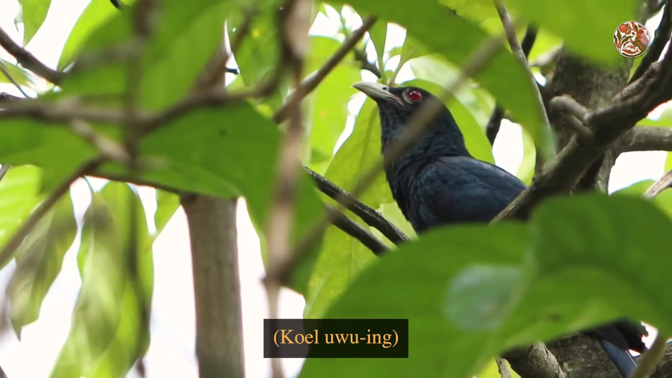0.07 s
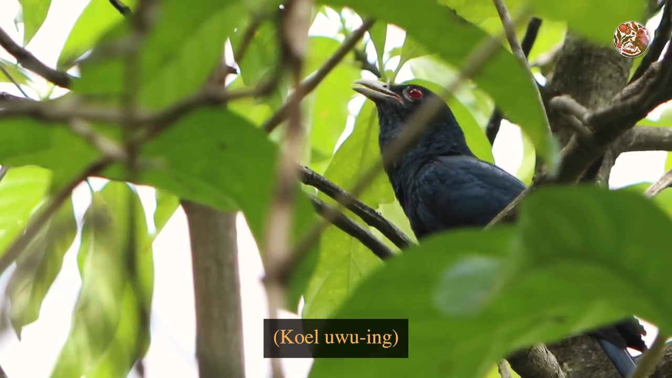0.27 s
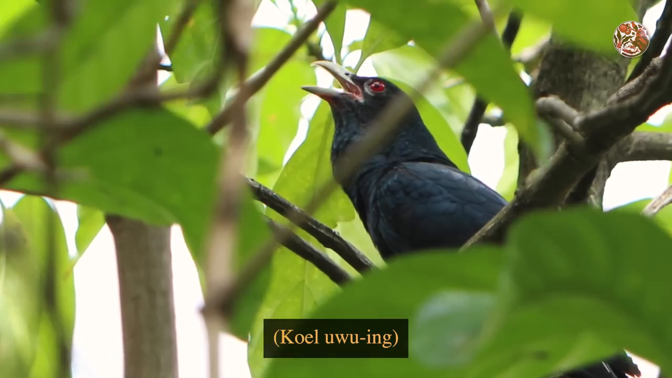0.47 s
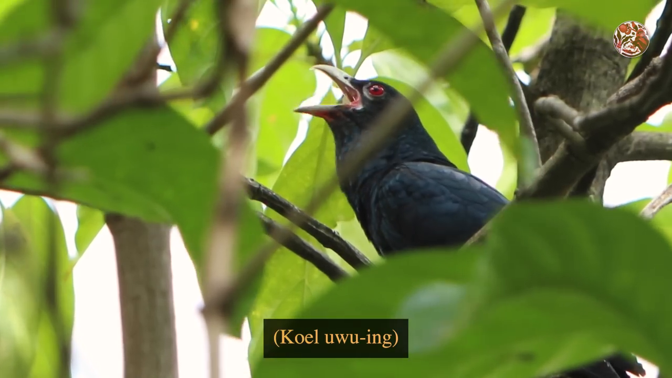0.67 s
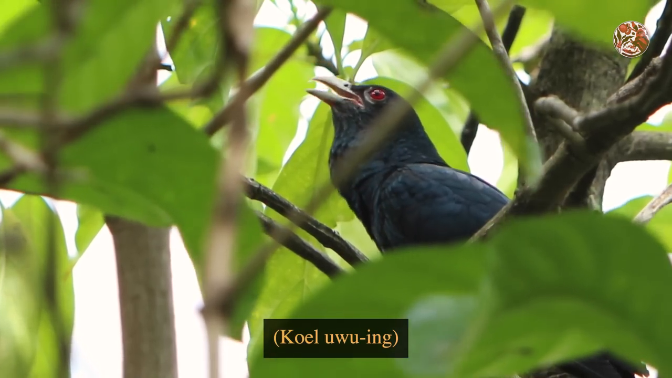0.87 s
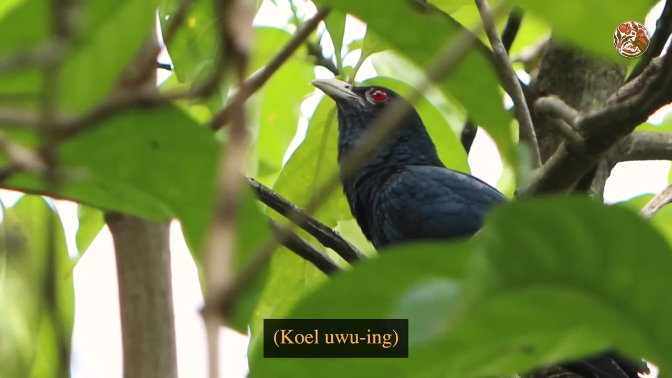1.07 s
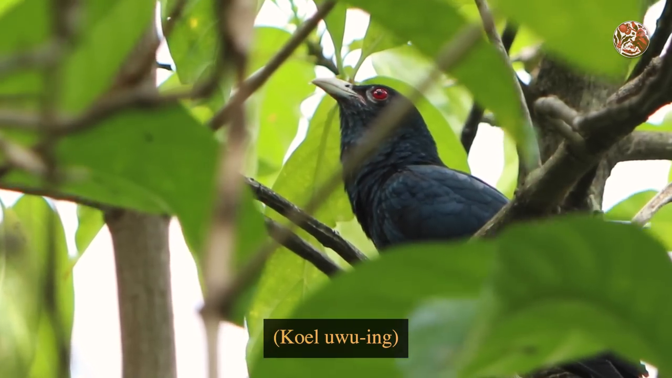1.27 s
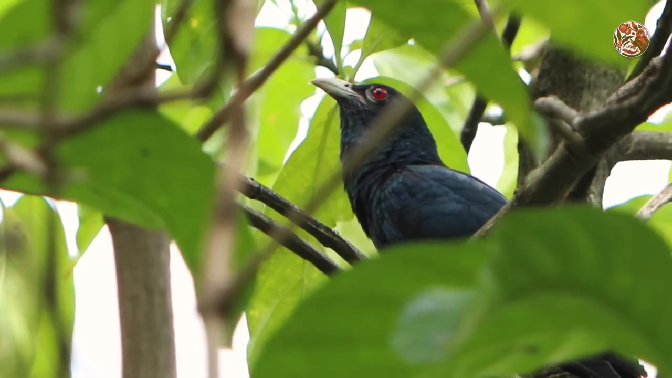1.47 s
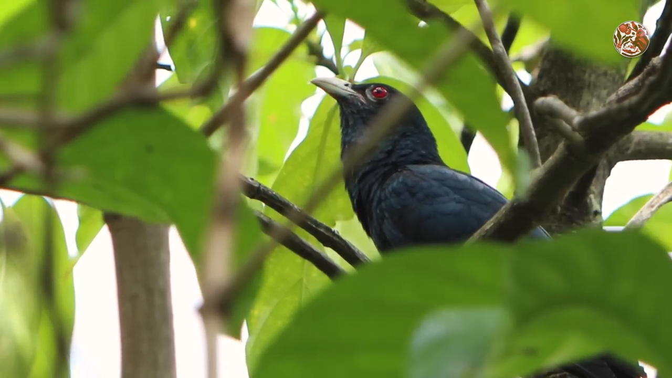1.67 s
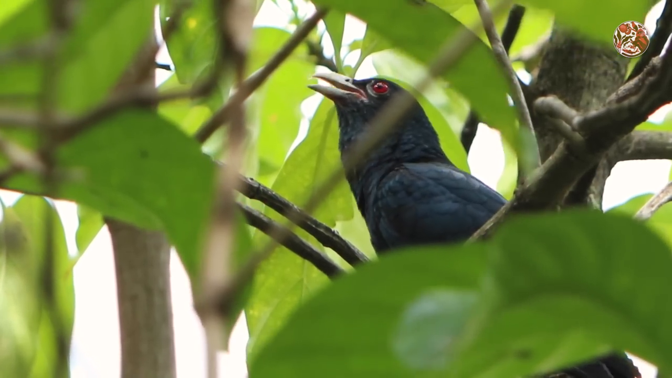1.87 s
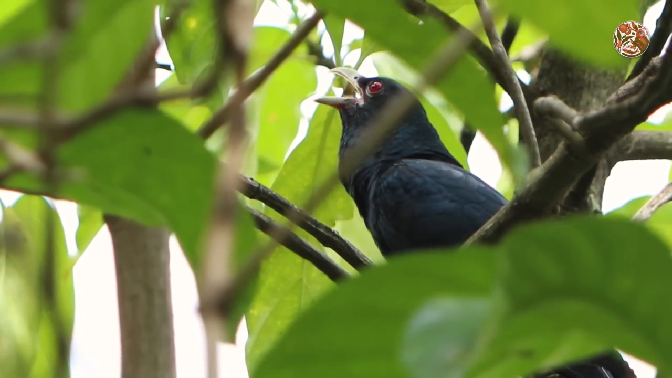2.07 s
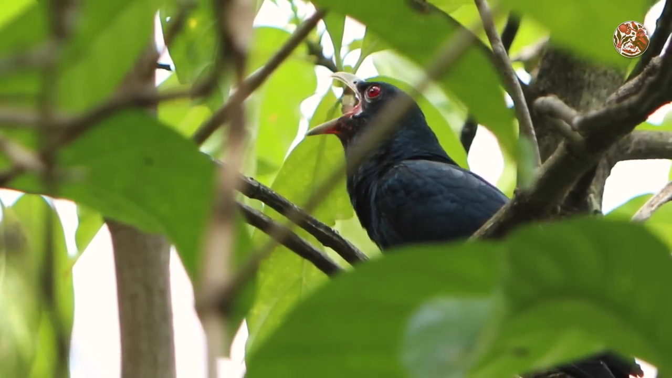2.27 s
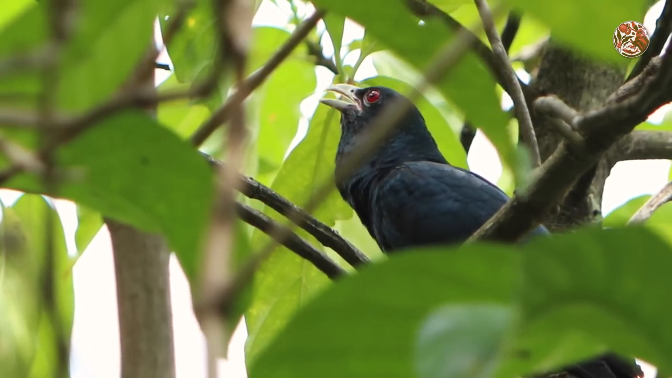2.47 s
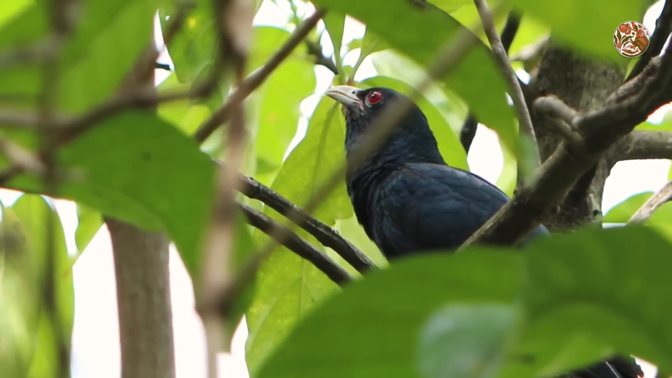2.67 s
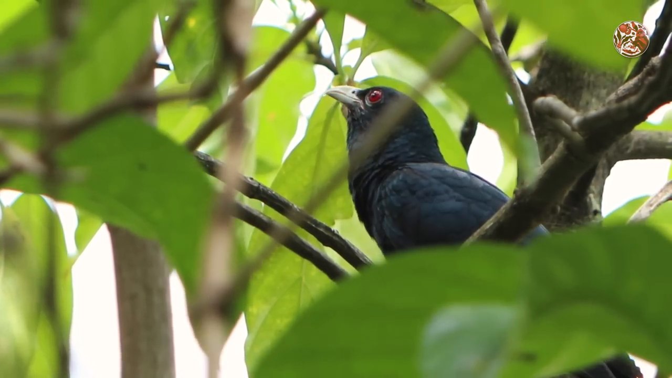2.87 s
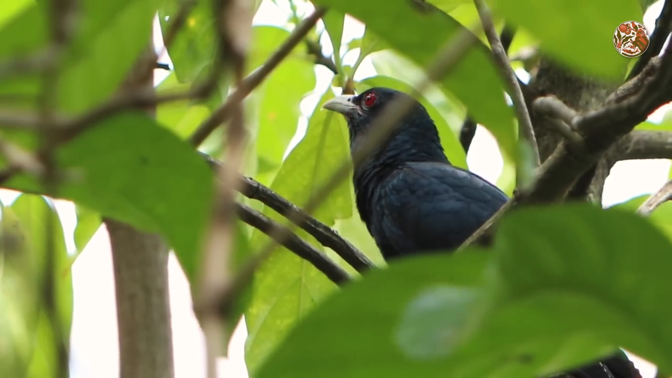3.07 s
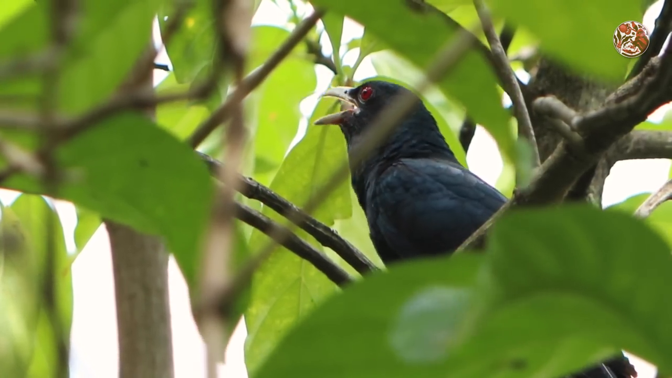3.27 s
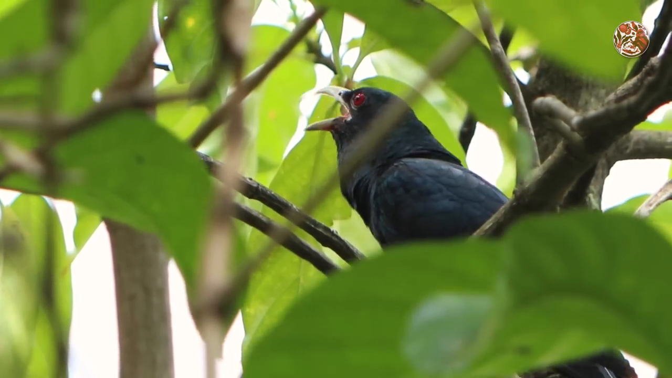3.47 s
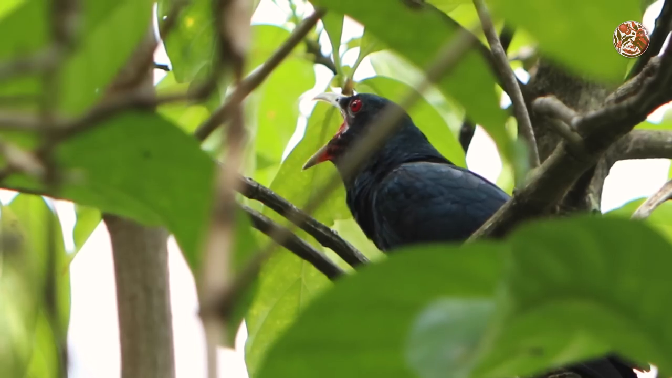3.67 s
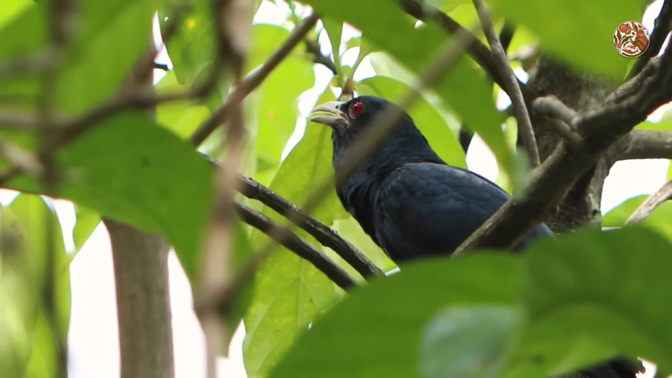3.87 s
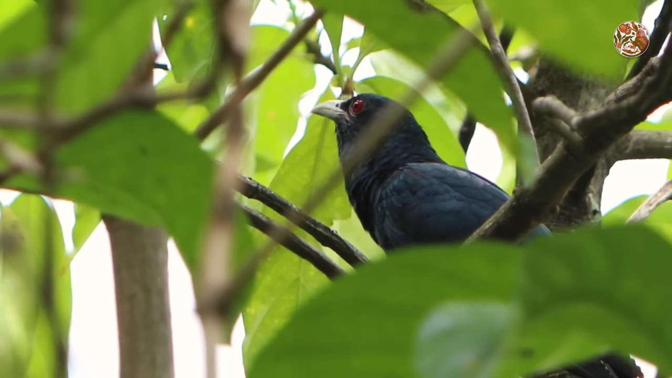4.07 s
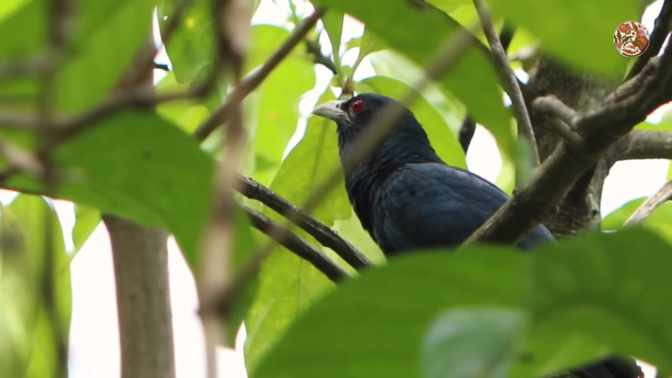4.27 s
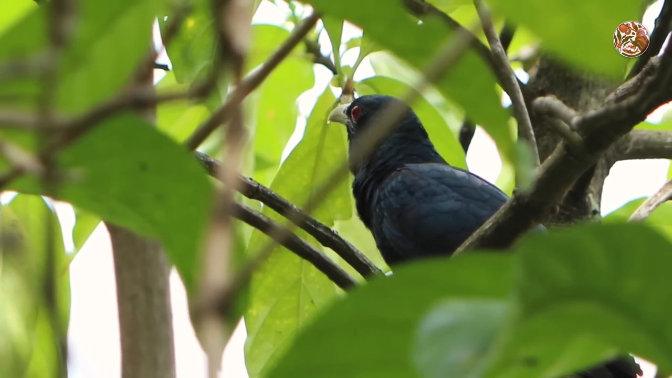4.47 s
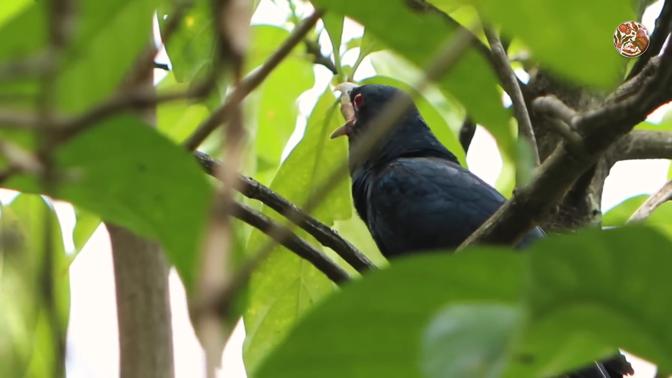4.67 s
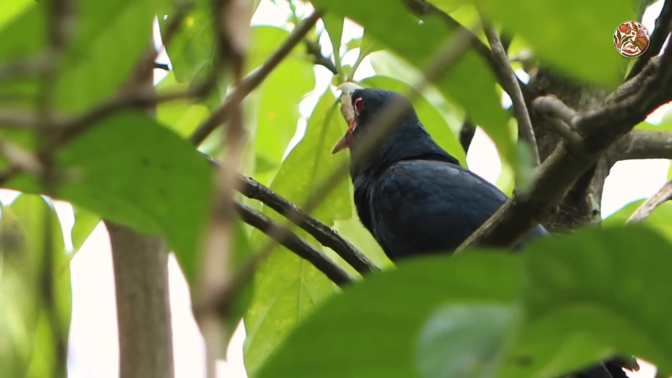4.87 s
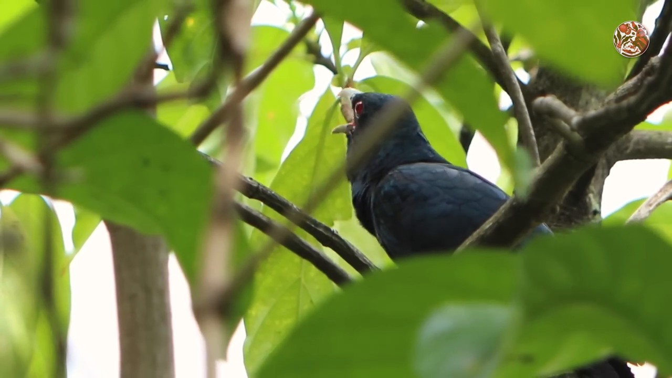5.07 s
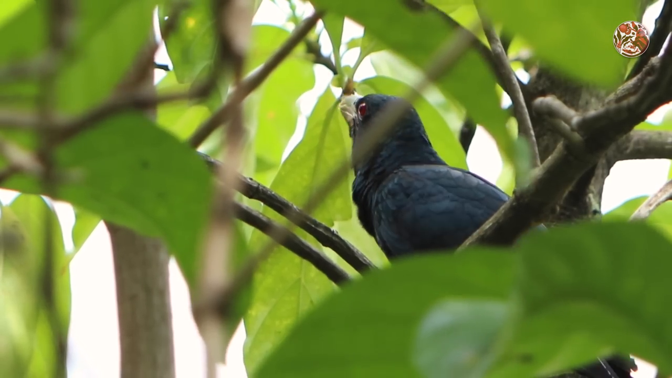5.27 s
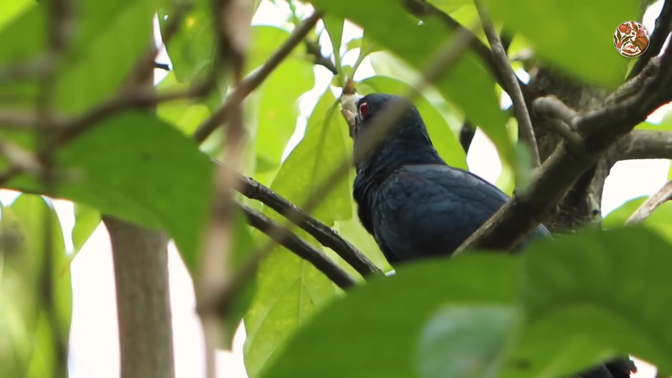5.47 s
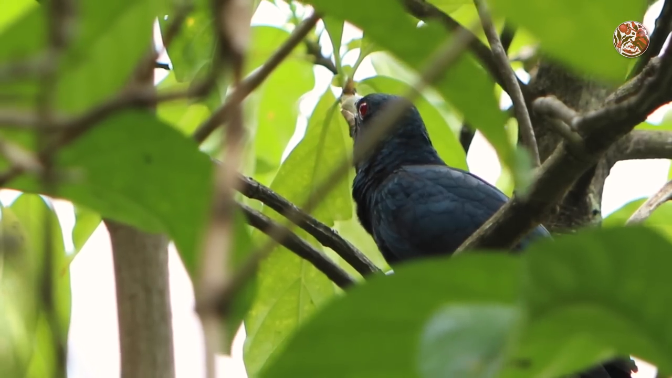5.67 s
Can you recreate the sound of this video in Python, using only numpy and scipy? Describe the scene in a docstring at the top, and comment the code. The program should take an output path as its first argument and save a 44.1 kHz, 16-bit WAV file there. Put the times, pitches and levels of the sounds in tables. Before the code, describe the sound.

A single dark bird calls four times from a tree: clear, almost pure whistles that hold, rise strongly, then drop quickly and break off with a small low puff. The pitch steps up from call to call. Underneath lie steady dull traffic noise, thin insect hiss, a short rustle at the start and very faint far bird notes. Open air, leafy reverberation, late wall echo.

```python
"""Traffic rumble, insect hiss and a brief low rustle open the scene, with faint far notes and noise swells.
Out of a leafy tree a koel whistles four rising calls: a held note, a swell up to a peak, a falling tail.
Each call is a near-sine with weak overtones, breath noise and a low puff as it breaks off.
Leaves and trunks scatter it, and a far wall returns it a third of a second later."""
import sys
import numpy as np
from scipy import signal
from scipy.fft import rfft, irfft
from scipy.io import wavfile

SR = 44100
rng = np.random.default_rng(int(sys.argv[2]) if len(sys.argv) > 2 else 0)


def dump(signal):
    """Clip the signal to [-1, 1] and save it as 16-bit WAV at the path in sys.argv[1]."""
    limited = np.clip(np.atleast_2d(signal).T, -1, 1)
    pcm = np.round(limited * 32767).astype(np.int16)
    wavfile.write(sys.argv[1], SR, pcm)


N = 253134


def from_db(db):
    """Decibels to amplitude."""
    return 10 ** (np.asarray(db) / 20)


def rms_one(x):
    """Scale a signal to an rms of 1."""
    return x / np.sqrt(np.mean(x ** 2) + 1e-20)


def decay(t, s):
    """Exponential fall from time zero on, 1 before it."""
    return np.exp(-np.maximum(t, 0) / s)


def level_curve(points):
    """Amplitude at every sample, from levels in dB joined by straight lines."""
    start_s, level_db = np.transpose(points)
    return from_db(np.interp(np.arange(N) / SR, start_s, level_db))


def at_hz(points, hz):
    """A spectrum table read on a log-frequency axis."""
    point_hz, level_db = np.transpose(points)
    return np.interp(np.log(hz), np.log(point_hz), level_db)


def drift(hz):
    """Slow chance: noise twice through a one-pole low-pass, spread 1."""
    r = np.exp(-2 * np.pi * hz / SR)
    noise = rng.standard_normal(N + SR)
    return rms_one(signal.lfilter([1], [1, -2 * r, r * r], noise)[SR:])


def band_noise(low_hz, high_hz):
    """White noise through a band-pass."""
    band = signal.butter(2, [low_hz, high_hz], "band", fs=SR, output="sos")
    return signal.sosfilt(band, rng.standard_normal(N))


def coloured_noise(spectrum, patchy_db):
    """Noise of the given colour whose level wavers by patchy_db; rms 1."""
    hz = np.maximum(np.arange(N // 2 + 1) * SR / N, 1)
    noise = irfft(rfft(rng.standard_normal(N)) * from_db(at_hz(spectrum, hz)), N)
    return rms_one(noise * from_db(patchy_db * drift(7.6)))


def noise_swells(rows):
    """Bands of noise, each under half a sine wave so it rises and fades."""
    out, t = np.zeros(N), np.arange(N) / SR
    for start_s, length_s, low_hz, high_hz, level_db in rows:
        envelope = np.sin(np.pi * np.clip((t - start_s) / length_s, 0, 1))
        out += from_db(level_db) * envelope * rms_one(band_noise(low_hz, high_hz))
    return out


# colour of the steady air, relative: [frequency_hz, level_db]
AIR_COLOUR = [(24, -33.5), (40, -20.5), (129, -4.5), (170, -2.5), (242, -3), (281, -8), (318, -6.5),
              (343, -9), (1320, -14), (1460, -15), (2530, -20.5), (3200, -17), (3950, -15), (6390, -34.5),
              (15700, -44.5)]
# its loudness over time: [start_s, level_db]
AIR_LEVEL = [(0.0, -57), (0.69, -56), (1.29, -54.5), (2.54, -54), (4.94, -56.5), (5.31, -54.5),
             (5.74, -54.5)]


def air():
    """Traffic rumble and insect hiss as one bed of shaped noise."""
    return level_curve(AIR_LEVEL) * coloured_noise(AIR_COLOUR, patchy_db=.3)


# colour of the passing rumble and rustle, relative: [frequency_hz, level_db]
RUSTLE_COLOUR = [(18, -34), (30, -8.5), (86, 1.5), (457, -2.5), (508, -5.5), (928, -4.5), (1270, -10.5),
                 (3530, -27.5), (12700, -35.5), (15700, -47)]
# its loudness over time: [start_s, level_db]
RUSTLE_LEVEL = [(0, -52.5), (0.17, -56), (0.3, -50.5), (0.45, -54), (0.6, -65), (1.0, -92.5)]


def rustle():
    """A patchier, low-heavy noise that dies away within the first second."""
    return level_curve(RUSTLE_LEVEL) * coloured_noise(RUSTLE_COLOUR, patchy_db=1.5)


# faint far notes, small birds among them: [start_s, length_s, start_hz, end_hz, wobble_hz, level_db]
FAR_NOTES = [(0.27, 0.13, 990, 950, 50, -58), (0.32, 0.11, 255, 255, 12, -53),
             (0.43, 0.07, 4100, 3500, 40, -59), (0.52, 0.3, 205, 200, 5, -57), (0.6, 1.7, 250, 248, 5, -58),
             (1.13, 0.18, 250, 258, 8, -48), (1.48, 0.05, 4400, 3800, 40, -62),
             (1.77, 0.08, 3520, 3480, 30, -65), (1.78, 0.1, 1810, 1790, 15, -65),
             (1.93, 0.06, 1800, 1800, 15, -65), (4.62, 0.07, 5600, 4100, 40, -64)]


def far_notes():
    """Each is a gliding sine, wavering in pitch and level, under a smooth swell."""
    out, t = np.zeros(N), np.arange(N) / SR
    wobble, waver_db = drift(60.0), 3 * drift(25.0)
    for start_s, length_s, start_hz, end_hz, wobble_hz, level_db in FAR_NOTES:
        progress = np.clip((t - start_s) / length_s, 0, 1)
        hz = start_hz + (end_hz - start_hz) * progress + wobble_hz * wobble
        tone = np.sin(2 * np.pi * np.cumsum(hz) / SR)
        out += from_db(level_db + waver_db) * np.sin(np.pi * progress) * tone
    return out


# short swells of noise: [start_s, length_s, low_hz, high_hz, level_db]
SWELLS = [(-0.1, 0.32, 40, 125, -55), (-0.2, 0.75, 12500, 13100, -79), (1.08, 0.15, 450, 1050, -57),
          (3.3, 0.16, 3150, 3300, -55), (4.76, 0.12, 2500, 3400, -58), (5.05, 0.14, 3650, 4150, -52)]


def extra_swells():
    """Bands of noise that come and go, two of them hoarse noise in the fourth call."""
    return noise_swells(SWELLS)


# dense scatter: foliage near by, a far wall and what lies behind it, the wide surroundings
FOLIAGE_DB, FOLIAGE_T60_S, FOLIAGE_BUILD_S = -47.5, 0.61, .01
WALL_S, WALL_DB, WALL_SPREAD_S, BEHIND_DB, BEHIND_T60_S = .338, -59.5, .012, -61.5, 0.52
WIDE_DB, WIDE_T60_S = -75, 3.5
SCATTER_S = 1.1   # length of the scatter


def scatter_level():
    """Amplitude of the dense scatter against delay, its parts summed in power."""
    t = np.arange(int(SCATTER_S * SR)) / SR
    foliage = from_db(FOLIAGE_DB - 60 * t / FOLIAGE_T60_S) * (1 - decay(t, FOLIAGE_BUILD_S))
    wall = from_db(WALL_DB) * np.exp(-.5 * ((t - WALL_S) / WALL_SPREAD_S) ** 2)
    behind = from_db(BEHIND_DB - 60 * (t - WALL_S) / BEHIND_T60_S) * (t > WALL_S)
    wide = from_db(WIDE_DB - 60 * t / WIDE_T60_S)
    return np.sqrt(foliage ** 2 + wall ** 2 + behind ** 2 + wide ** 2)


DIRECT_TREBLE_DB = -4.5   # leaves in the line of sight shade the direct treble
TREBLE_SCATTER_DB, TREBLE_T60_S = -30, 0.24
FAR_TREBLE_DB, FAR_CUT_HZ = -10.5, 5600   # long paths lose the top
# single echoes from ground, trunks, branches and, last, the far wall: [delay_s, level_db]
SINGLE_ECHOES = [(0.0052, -28), (0.0099, -11.5), (0.0183, -17), (0.0235, -20), (0.03, -24.5), (0.0447, -27),
                 (0.0577, -27.5), (0.338, -31)]


def trees(whistle, treble):
    """Direct sound, single echoes and dense scatter from foliage; the treble is absorbed sooner."""
    out = whistle + from_db(DIRECT_TREBLE_DB) * treble
    for delay_s, level_db in SINGLE_ECHOES:
        lag = int(delay_s * SR)
        out[lag:] += from_db(level_db) * whistle[:-lag]

    count = int(SCATTER_S * SR)
    t = np.arange(count) / SR
    far_response = scatter_level() * rng.standard_normal(count)
    near_treble_db = TREBLE_SCATTER_DB - 60 * t / TREBLE_T60_S
    near_response = from_db(near_treble_db) * rng.standard_normal(count)
    dull = signal.sosfilt(signal.butter(4, FAR_CUT_HZ, fs=SR, output="sos"), treble)
    out += signal.fftconvolve(whistle + from_db(FAR_TREBLE_DB) * dull, far_response)[:N]
    return out + signal.fftconvolve(treble, near_response)[:N]


RISE_POWER, DROP_POWER, SAG_HZ_PER_S = 1.6, 1.9, 1300   # climb to the peak, quick drop, slow sag
SCOOP_HZ, SCOOP_S, SETTLE_S = 92, 0.0057, .03   # entered from below, overshoots and settles
ATTACK_DB, ATTACK_S, ACCENT_DB, ACCENT_S = -21.5, 0.011, 6.5, .06   # soft entry, then a small accent
SWELL_S, SWELL_POWER, HOLD_S, FADE_DB_PER_S = 0.11, 4.1, 0.031, 155.5   # effort round the peak


def gesture(t, start, peak, end, rise_s, drop_s, held_hz, peak_hz, end_hz, over_hz, held_db, top_db):
    """Pitch and effort of one call: held note, swell to the peak, drop and sag."""
    before, after = np.maximum(peak - t, 0), np.maximum(t - peak, 0)
    lift = np.exp(-(before / rise_s) ** RISE_POWER - (after / drop_s) ** DROP_POWER)
    sagging_hz = end_hz + SAG_HZ_PER_S * np.maximum(end - t, 0)
    rest_hz = np.where(t < peak, held_hz, sagging_hz)
    pitch = rest_hz + (peak_hz - rest_hz) * lift
    pitch += over_hz * decay(t - start, SETTLE_S) - (SCOOP_HZ + over_hz) * decay(t - start, SCOOP_S)
    effort_db = held_db + (top_db - held_db) * np.exp(-(before / SWELL_S) ** SWELL_POWER)
    effort_db += ATTACK_DB * decay(t - start, ATTACK_S) + ACCENT_DB * decay(t - start, ACCENT_S)
    return pitch, effort_db - FADE_DB_PER_S * np.maximum(after - HOLD_S, 0)


BREATH_DB = -22   # breath noise relative to the effort
BRIGHT_START_DB, BRIGHT_START_S = 6.5, 0.034   # overtones get a lift at the entry
TAIL_TREBLE_DB_PER_S = 23.5   # and fade more slowly than the whistle
HOARSE_DB_PER_S, HOARSE_HZ = 22, 150   # overtones roughen as the call falls away
OCTAVE_FADE_DB_PER_S = 89   # the octave dies early in the fall
# strength of overtones 2 to 14 at the syrinx, relative to the effort: [level_db]
OVERTONES_DB = [-9.5, -16.5, -1, 3, -13.5, -5.5, -7, -10, -20, -9, -14.5, -23, -8]
# colour of throat and beak on the overtones: [frequency_hz, gain_db]
BEAK = [(2000, -9), (3000, 5.5), (3900, -11), (4700, -2), (5500, -8.5), (7200, -4), (8300, -6.5),
        (10500, -0.5), (13000, -6.5), (15000, -0.5), (15900, -15.5)]
# gain of the throat on the whistle, strongest at its resonance: [frequency_hz, gain_db]
THROAT = [(930, 31.5), (1070, 30.5), (1150, 30.5), (1210, 31), (1275, 34), (1325, 26), (1415, 33),
          (1470, 33), (1530, 22), (1620, 19)]


def call(row, onset_s=0.0041, droop=0.067, droop_s=0.018, catch_db=10.0, catch_s=.03):
    """One call: a near-sine with weak overtones and breath; returns whistle and treble."""
    t = np.arange(N) / SR
    start, peak, end, top_lift_db = row[0], row[1], row[2], row[-1]
    pitch, effort_db = gesture(t, *row[:-1])
    whistle_db = effort_db + at_hz(THROAT, pitch)
    pitch *= 1 - droop * np.exp(np.minimum(t - end, 0) / droop_s)   # the pitch sags as the air runs out
    gate = np.clip(np.minimum(t - start, end - t) / onset_s + 1, 0, 1)

    span = slice(int((start - onset_s) * SR), int((end + onset_s) * SR))
    phase = 2 * np.pi * np.cumsum(pitch[span]) / SR
    whistle, treble = np.zeros(N), np.zeros(N)
    whistle[span] = np.sqrt(2) * from_db(whistle_db[span]) * np.sin(phase)

    falling_s = np.maximum(t - peak, 0)
    bright_db = BRIGHT_START_DB * decay(t - start, BRIGHT_START_S) + TAIL_TREBLE_DB_PER_S * falling_s
    overtone_base_db = (effort_db + bright_db)[span]
    falling_s = falling_s[span]
    flicker, rasp = drift(12.0), drift(HOARSE_HZ)
    for k, strength_db in enumerate(OVERTONES_DB, 2):
        hz = k * pitch[span]
        # shifted chance lets every overtone wax, wane and roughen on its own
        shift = k * SR // 3 - span.start
        own_flicker = np.roll(flicker, shift)[:len(hz)]
        own_rasp = np.roll(rasp, shift)[:len(hz)]
        level_db = overtone_base_db + strength_db + at_hz(BEAK, hz)
        level_db += 2.4 * own_flicker + top_lift_db * (k - 2) / 10
        level_db += falling_s * HOARSE_DB_PER_S * own_rasp
        if k == 2:
            level_db -= falling_s * OCTAVE_FADE_DB_PER_S
        layer = whistle if k == 2 else treble   # the octave is low enough to travel like the whistle
        audible = hz < .45 * SR   # stay clear of aliasing
        layer[span] += np.sqrt(2) * from_db(level_db) * audible * np.sin(k * phase)

    husky_db = catch_db * decay(t - start, catch_s)   # the voice starts with a husky catch
    treble += from_db(effort_db + BREATH_DB + husky_db) * band_noise(3000, 12000)
    return gate * whistle, gate * treble


# the four calls: [start_s, peak_s, end_s, rise_s, drop_s, held_hz, peak_hz, end_hz (before the final
# pitch droop), overshoot_hz, held_effort_db, top_effort_db, top_overtone_lift_db (reached at overtone 12)]
WHISTLES = [(0.509, 0.863, 1.087, .100, 0.062, 1149, 1427, 944.6, 9.5, -59.5, -43.5, -1.5),
            (2.080, 2.432, 2.675, 0.1, 0.053, 1184, 1461, 952, 20.5, -58, -41, -2.5),
            (3.419, 3.778, 3.991, .082, 0.052, 1213, 1512, 1016, 85, -58, -40.5, 0),
            (4.764, 5.098, 5.303, 0.09, .060, 1276, 1617, 1051, 60, -52, -39.5, 0.7)]


def koel():
    """All four calls from the syrinx, as whistle and treble."""
    return np.sum([call(row) for row in WHISTLES], axis=0)


def puffs(lead_s=0.039, length_s=0.083, low_hz=530, high_hz=960, level_db=-63):
    """A low puff of band noise as each call breaks off."""
    return noise_swells([(row[2] - lead_s, length_s, low_hz, high_hz, level_db) for row in WHISTLES])


def scene():
    """Bird in the trees over the background, with the noise swells and puffs."""
    background = air() + rustle() + far_notes()
    whistle, treble = koel()
    bird = trees(whistle, treble) + puffs()
    return (background + extra_swells() + bird)[None]


HISS_DB, CUTOFF_HZ = -79, 15700   # hiss level before the filters, steep top cut


def record(dry):
    """The microphone hisses and loses the deep bass; the top is cut steeply."""
    dry = dry + from_db(HISS_DB) * rng.standard_normal(dry.shape)
    dry = signal.sosfilt(signal.butter(1, 60, "high", fs=SR, output="sos"), dry)
    return signal.sosfilt(signal.ellip(12, .5, 70, CUTOFF_HZ, fs=SR, output="sos"), dry)


dry = scene()
out = record(dry)
dump(out)
```